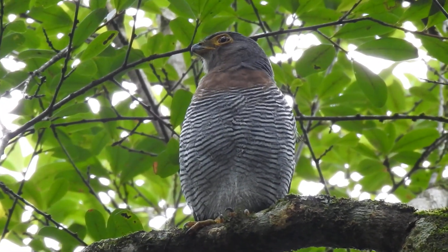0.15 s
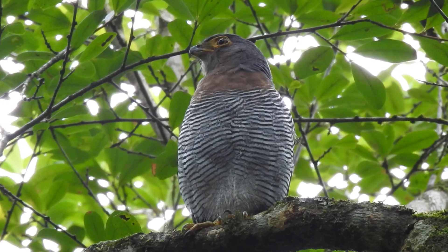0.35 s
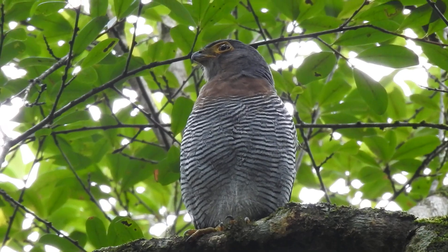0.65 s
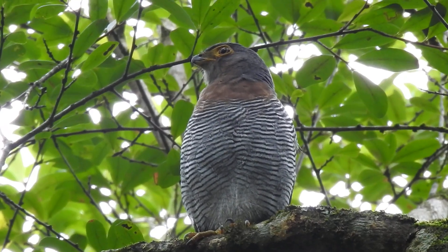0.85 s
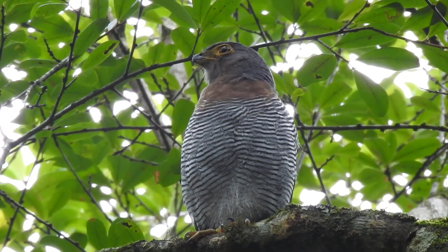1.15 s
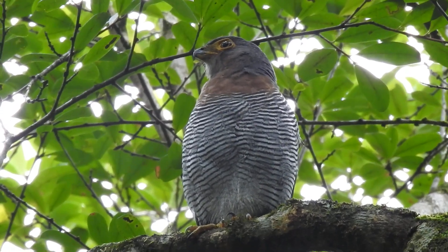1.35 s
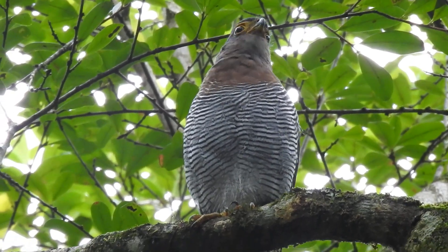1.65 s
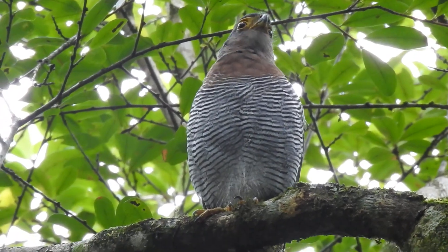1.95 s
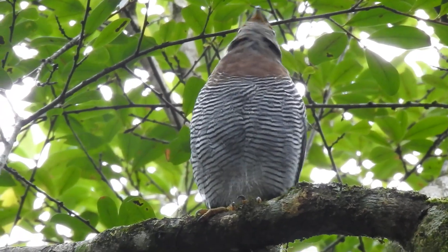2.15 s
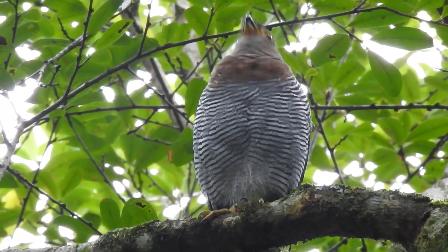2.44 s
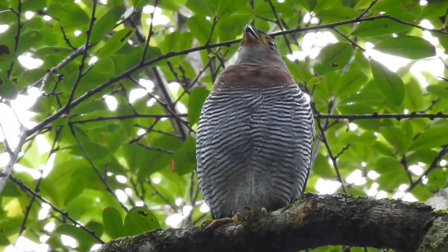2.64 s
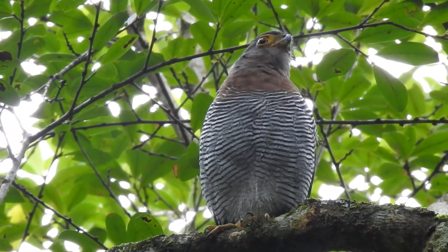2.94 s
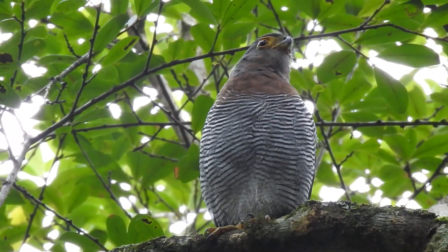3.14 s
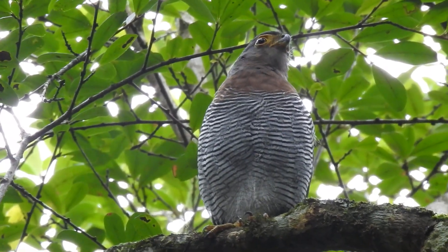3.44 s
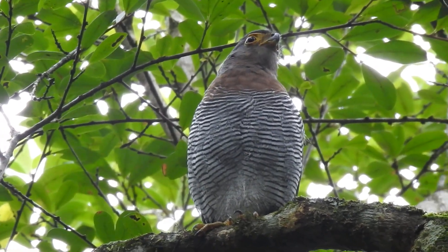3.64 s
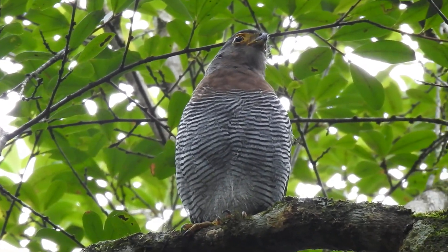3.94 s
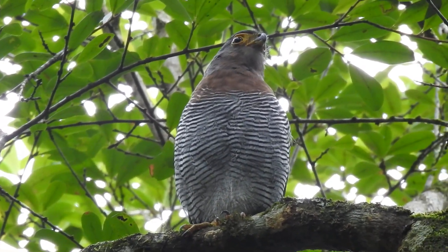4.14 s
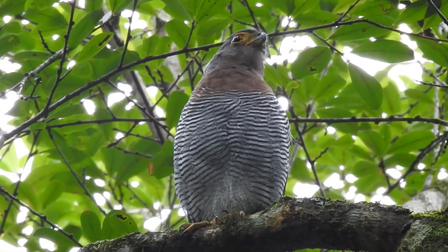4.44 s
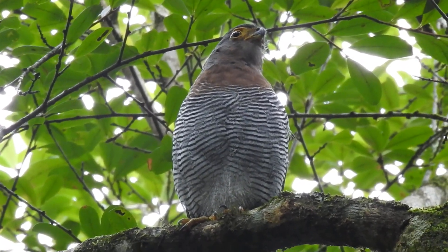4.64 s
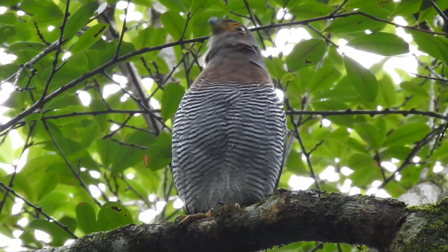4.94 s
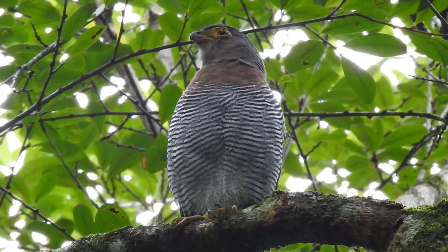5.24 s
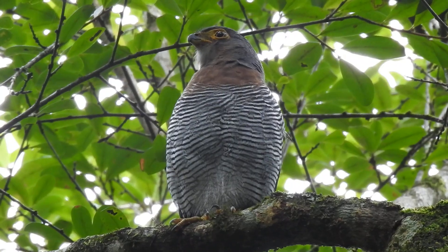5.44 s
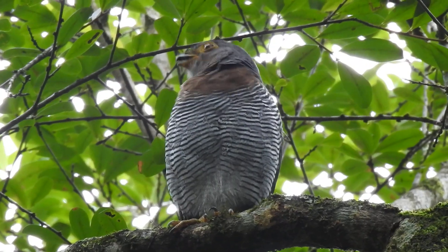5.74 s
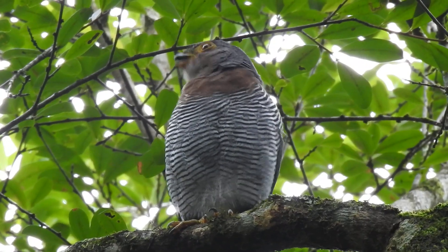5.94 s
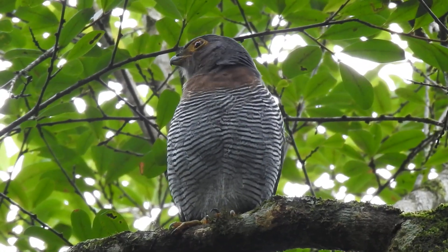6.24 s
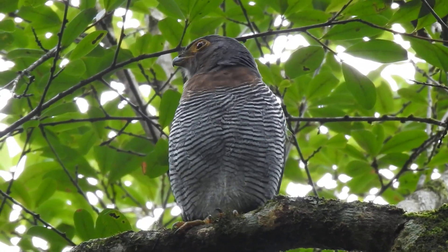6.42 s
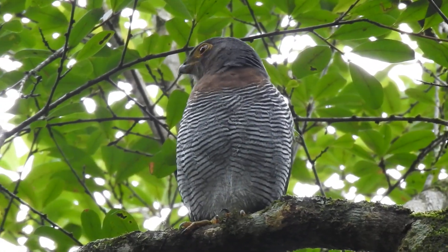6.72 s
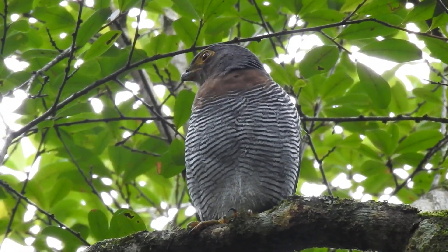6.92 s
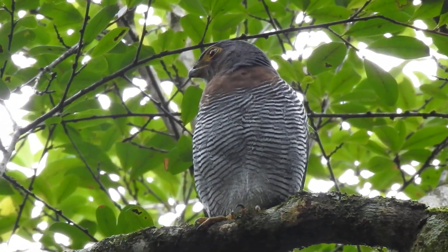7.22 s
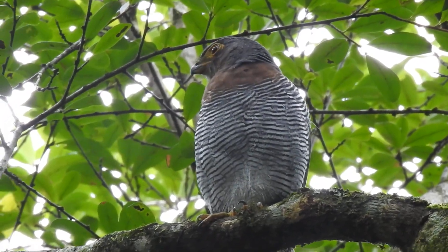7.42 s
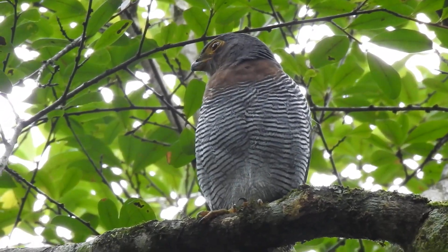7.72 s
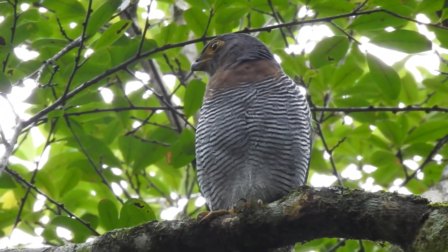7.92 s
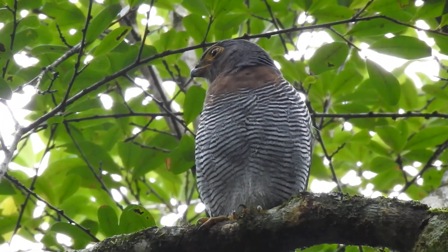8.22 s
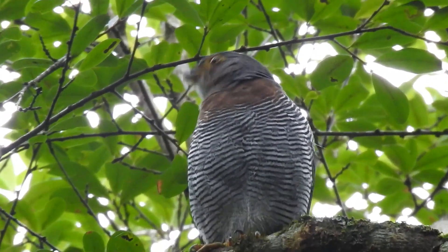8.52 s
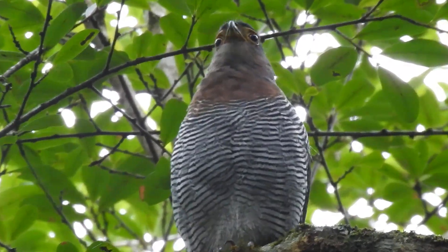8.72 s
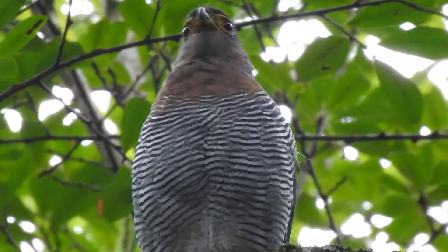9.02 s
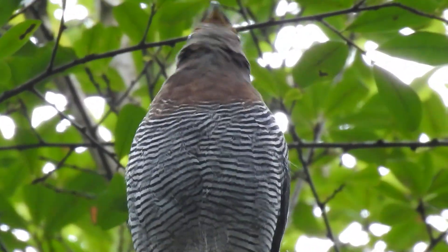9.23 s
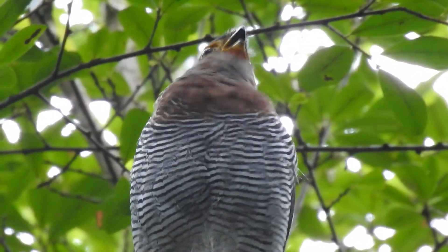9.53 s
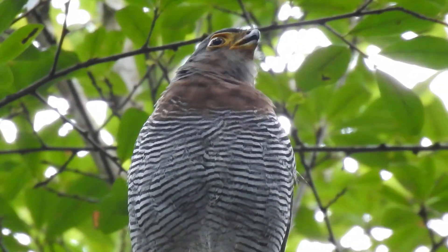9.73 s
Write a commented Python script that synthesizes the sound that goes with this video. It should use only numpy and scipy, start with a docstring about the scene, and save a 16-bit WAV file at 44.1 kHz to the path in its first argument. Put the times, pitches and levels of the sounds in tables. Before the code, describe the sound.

In leafy forest, steady insect hiss and a low soft rumble lie under small birds' chits, slurs and buzzes. A nearby falcon gives three bursts of barking yelps, each opening with a softer note, a pause, then loud abrupt ones. Thin falling whistles drift between. Late on, the camera at the microphones whirs, is bumped and clicks sharply.

```python
"""A small bird chits close by in the leaves, over steady insect hiss and a low forest rumble.
Then a forest falcon on a near branch yelps in three bursts, each a soft note and then four loud ones
(three in the last): stacks of harmonics that glide down and dive. Small birds around it trill swept
whistles as chits, slurs, buzzes and ticks, farther ones whistle thinly; leaves and trunks scatter it all.
Near the end the camera at the two microphones is bumped, its zoom whirs as ringing noise, and it clicks."""
import sys
import numpy as np
from scipy import signal
from scipy.fft import rfft, irfft
from scipy.io import wavfile

SR = 44100
rng = np.random.default_rng(int(sys.argv[2]) if len(sys.argv) > 2 else 0)


def generate_wav(signal):
    """Clip the signal to [-1, 1] and save it as 16-bit WAV at the path in sys.argv[1]."""
    frames = np.transpose(np.atleast_2d(signal))
    scaled = np.clip(frames, -1, 1) * 32767
    pcm = np.round(scaled).astype(np.int16)
    wavfile.write(sys.argv[1], SR, pcm)


N = 435266  # samples

# The falcon's yelps. Each row: start in seconds, level in dB, first pitch in Hz before any squeak,
# glide length in seconds, bend (1 = straight fall, more = pitch held longer),
# first beak resonance in Hz, its level in dB, upper overtones in dB.
FALCON_YELPS = [(1.640, -21, 929, 0.029, 1.28, 7180, -1, -1.5),
                (2.279, -18, 1075, 0.049, 0.99, 6720, 2.5, -3),
                (2.467, -16, 1312, 0.044, 0.88, 6230, -4, 0.5),
                (2.615, -15.5, 1324, 0.035, 0.8, 6170, -6.5, 1.5),
                (2.815, -15.5, 1208, 0.045, 1.28, 6160, -4, 1),
                (5.004, -21, 933, 0.034, 1.17, 7070, -0.5, -3),
                (5.719, -18, 1030, 0.044, 1.08, 6920, -4, -2.5),
                (5.932, -16, 1327, 0.038, 0.97, 6200, -6, 1.5),
                (6.077, -15.5, 1332, 0.033, 1.14, 6100, -5.5, 1),
                (6.273, -18, 1200, .047, 1.7, 5850, -4, 5), (8.675, -21, 966, 0.034, 1, 7250, -14, 2),
                (9.334, -18, 1098, 0.051, 0.84, 6680, 3, -3),
                (9.530, -16, 1324, 0.045, 0.76, 6240, -7.5, 2.5),
                (9.678, -15.5, 1372, 0.04, 0.75, 6340, -5.5, 0.5)]
# Branch and trunk beside the falcon. Each row: delay in seconds, level in dB, polarity.
PERCH_ECHOES = [(.0011, -34.5, 1), (.00268, -16, -1), (.00658, -24, -1), (.00997, -14.5, -1)]
# The falcon's side of the microphones. Each row: frequency in Hz, left minus right in dB.
FALCON_SIDE = [(1000, -1), (2200, 0), (7000, 1.5)]


def falcon():
    """The near bird: direct sound, echoes off its own perch, then the uneven echo of the forest."""
    dry = np.zeros(N)
    for s, *note in FALCON_YELPS:
        add(dry, s, yelp(*note))
    near = dry.copy()
    for delay, db, polarity in PERCH_ECHOES:
        add(near, delay, np.sign(polarity) * amp(db) * dry)
    left = colour(near, [(hz, db / 2) for hz, db in FALCON_SIDE])
    right = colour(near, [(hz, -db / 2) for hz, db in FALCON_SIDE])
    flutter = amp(2 * wander(N, 70))
    echo = scatter(near, near_db=-3.0, near_t60=0.15, far_db=-11.0, gap_s=0.0041,
                   width=0.74, echoes_per_s=800)
    return np.array([left, right]) + flutter * echo


SOFT_HZ, FORCED_HZ = 926, 1215  # first pitch of the softest and of a fully forced yelp
BREAK_HZ, LAST_HZ = 811.6, 475  # the glide ends where the voice gives way, the dive at the last pitch
SOFT_DIVE_S, FORCED_DIVE_S = .032, .02
GLIDE_FADE_DB, DIVE_FADE_DB = -8.5, -9
SOFT_BEAK_SHIFT_HZ, FORCED_BEAK_SHIFT_HZ = -550, 890  # how far the beak resonance moves in a glide
# The falcon's colour as heard: throat and beak, with narrow dips from nearby reflections.
# Each row: frequency in Hz, gain in dB.
FALCON_COLOUR = [(450, -20), (820, -10.5), (895, -15.5), (970, -14.5), (1250, -18), (1520, -24),
                 (1720, -19.5), (2700, -16), (3550, -12.5), (4150, -23.5), (4700, -19), (5200, -17),
                 (6500, -26.5), (7400, -17), (8400, -19), (10000, -26.5), (12500, -43.5), (16000, -59.5)]


def yelp(level_db, first_hz, length, bend, beak_hz, beak_db, bright_db, jitter=0.012, beak_width_hz=330,
         squeak=0.12, squeak_s=0.0012, rasp_db=-42, uneven_db=5, tuned_db=19.5, dull_db=-8, mellow_db=3,
         spent_db=-5.0):
    """Harmonics glide, then dive; the throat favours the second, less so in the dive; the beak rings."""
    # high notes are forced: they start abruptly, with a squeak
    force = np.clip((first_hz - SOFT_HZ) / (FORCED_HZ - SOFT_HZ), 0, 1)
    dive_s = SOFT_DIVE_S + force * (FORCED_DIVE_S - SOFT_DIVE_S)
    t = np.arange(0, length + dive_s, 1 / SR)
    glide, dive = ramp(t, length), ramp(t - length, dive_s)

    pitch = first_hz + (BREAK_HZ - first_hz) * glide ** bend + (LAST_HZ - BREAK_HZ) * dive
    pitch = pitch * (1 + force * squeak * np.exp(-t / squeak_s))
    order = np.arange(1, 19)[:, None]
    # rougher as the voice gives way
    hz = order * pitch * (1 + jitter * (1 + 2 * dive) * wander(len(t), 1571))

    tuned = tuned_db * (order == 2) * (1 - np.sqrt(dive) / 2)
    gain = amp(read(FALCON_COLOUR, hz) + tuned + bright_db * (order > 3))
    gain = gain * amp(mellow_db * (1.5 - force) * (order == 1))  # soft yelps: fuller fundamental
    shift_hz = SOFT_BEAK_SHIFT_HZ + force * (FORCED_BEAK_SHIFT_HZ - SOFT_BEAK_SHIFT_HZ)
    beak = beak_hz + glide * shift_hz
    gain = gain + amp(beak_db) / (1 + ((hz - beak) / beak_width_hz) ** 2)
    flutter = np.array([wander(len(t), 150) for _ in order])
    gain = gain * amp(uneven_db * np.minimum(order / 4, 1) * flutter)  # the overtones flutter most
    gain = gain * amp(dull_db * (glide ** 2 + dive) * (order > 3))  # and die first

    turns = np.cumsum(hz, 1) / SR + rng.random(order.shape)
    voice = (gain * (hz < SR / 2) * np.sin(2 * np.pi * turns)).sum(0)
    voice += force * amp(rasp_db) * unit(colour(rng.standard_normal(len(t)), FALCON_COLOUR))
    attack = 1 - np.exp(-t / (0.0013 + 0.0072 * (1 - force)))
    gate = attack * signal.windows.tukey(len(t), .03)
    fade_db = GLIDE_FADE_DB * glide ** 2 + DIVE_FADE_DB * dive
    fade_db = fade_db + spent_db * force * glide  # forced notes are spent sooner
    return np.sqrt(2) * voice * amp(level_db + fade_db) * gate


LEAD_S = .2  # the track of the birds in the foliage begins this long before time zero
# How the birds near the falcon shape each kind of call: settings of chirp() by name, with
# frequencies in Hz, times in seconds, levels in dB, and drop, scoop, trill depth and jitter as fractions.
CHIT_SHAPE = dict(top_hz=3112, length=.05, start_hz=1760, rise_s=.028, rise_curve=1.7, drop=0.167, drop_s=0.016, attack_s=0.019, onset_db=-16, fade_db_per_s=-300, trill_hz=167.2, trill_depth=0.12, trill_grows_s=0.03, jitter=0.022, partials_db=[4, 3.5, 6.5, 10, -15])
SLUR_SHAPE = dict(start_hz=4180, rise_s=0.046, attack_s=0.032, onset_db=-18.5, fade_db_per_s=-13, release_s=0.039, trill_hz=144.1, trill_depth=0.028, jitter=0.013, partials_db=[-1, -20])
BUZZ_SHAPE = dict(start_hz=3960, rise_s=.018, drop=0.44, drop_s=0.016, attack_s=0.013, onset_db=-15, fade_db_per_s=-93, release_s=0.0052, trill_hz=160.3, trill_depth=0.18, trill_grows_s=0.0335, jitter=0.0324, partials_db=[0])
PIP_SHAPE = dict(top_hz=1766, length=0.036, start_hz=1152, rise_s=0.015, drop=0.17, drop_s=0.0112, attack_s=0.016, onset_db=-14.5, fade_db_per_s=-300, release_s=0.014, trill_hz=163, trill_depth=0.077, jitter=0.044, partials_db=[-12.5, 6, -2.5, -6])
TICK_SHAPE = dict(top_hz=3660, length=0.048, start_hz=2380, rise_s=0.045, rise_curve=4.6, scoop=0.208, attack_s=0.0425, onset_db=-19, fade_db_per_s=-1200, trill_hz=119, trill_depth=.006, jitter=0.02, partials_db=[-16, -2, 5.5])
# Chits, pips and ticks, before colour and foliage. Each row: start in seconds, level in dB.
CHIT_CALLS = [(.046, -28.5), (.445, -41), (1.329, -29.5), (2.146, -28.5), (2.92, -27), (3.716, -28),
              (4.76, -28.5), (5.74, -27), (6.743, -27), (7.942, -28), (9.003, -25.5)]
PIP_CALLS = [(.591, -22.5), (5.226, -23)]
TICK_CALLS = [(9.156, -22.5), (9.265, -25)]
# Slurs and buzzes, before colour and foliage.
# Each row: start in seconds, level in dB, top pitch in Hz, length in seconds.
SLUR_CALLS = [(-.085, -12.5, 6120, 0.093), (3.803, -14.5, 6283, 0.092), (8.141, -13, 6244, 0.11)]
BUZZ_CALLS = [(.509, -12.5, 6990, 0.079), (4.368, -13.5, 6880, 0.098), (8.834, -13.5, 7160, 0.08)]


def small_birds():
    """Scolding birds in the foliage, one already in mid-call, and a nearer one that ticks."""
    chits = colour(chirps(CHIT_CALLS, CHIT_SHAPE, LEAD_S),
                   [(2100, 3.5), (2750, -7.0), (3600, 8.5), (4300, 11.0), (5300, 17.0), (7000, 14.5),
                    (8500, -4.5), (11000, -15.0)])
    slurs = chirps(SLUR_CALLS, SLUR_SHAPE, LEAD_S)
    pips = chirps(PIP_CALLS, PIP_SHAPE, LEAD_S)
    buzzes = colour(chirps(BUZZ_CALLS, BUZZ_SHAPE, LEAD_S),
                    [(4300, -7), (5600, -4.5), (6900, 1), (8000, -4), (8500, -18)])
    scolds = in_foliage(chits + slurs + pips, left_db=2.0) + in_foliage(buzzes, left_db=0.0)
    ticks = colour(chirps(TICK_CALLS, TICK_SHAPE), [(7000, 3.5), (9000, -32)])
    tick_echo = scatter(colour(ticks, LEAF_COLOUR), near_db=3, near_t60=0.091, far_db=0.5, gap_s=0.0045)
    return scolds + ticks + tick_echo


def chirps(calls, kind, lead_s=0):
    """All calls of one kind, on a track that begins lead_s before time zero."""
    out = np.zeros(N + round(lead_s * SR))
    for s, *call in calls:
        add(out, s + lead_s, chirp(*call, **kind))
    return out


def chirp(level_db, top_hz, length, trill_hz, trill_depth, jitter, partials_db, start_hz=None, rise_s=.02,
          rise_curve=1, sag_hz_per_s=0, drop=0, drop_s=.02, attack_s=.002, onset_db=0, fade_db_per_s=0,
          release_s=0.002, trill_grows_s=0.022, scoop=0):
    """A whistle whose pitch may rise, sag and drop, shaken by a fast uneven trill; it swells and fades."""
    t = np.arange(0, length, 1 / SR)
    hz = top_hz - sag_hz_per_s * t
    if start_hz:
        hz = hz - (top_hz - start_hz) * (1 - ramp(t, rise_s) ** rise_curve)
    hz = hz * (1 - drop * (1 - ramp(length - t, drop_s)))
    hz = hz * (1 - scoop * np.exp(-t / 0.00497))  # some calls scoop up into their first pitch
    trill_turns = np.cumsum(trill_hz * (1 + 0.171 * wander(len(t), 101.1))) / SR
    trill = ramp(t, trill_grows_s) ** 2 * np.sin(2 * np.pi * trill_turns)
    turns = np.cumsum(hz * (1 + trill_depth * trill) * (1 + jitter * wander(len(t), 874.0))) / SR
    tone = sum(amp(db) * np.sin(2 * np.pi * k * turns) for k, db in enumerate(partials_db, 1))
    shape_db = onset_db * (1 - ramp(t, attack_s)) + fade_db_per_s * np.maximum(t - attack_s, 0)
    gate = ramp(length - t, release_s) * signal.windows.tukey(len(t), .08)
    return unit(tone) * amp(level_db + shape_db) * gate


# Leaves throw back short waves best. Each row: frequency in Hz, gain in dB.
LEAF_COLOUR = [(2000, -8.5), (4200, -1)]


def in_foliage(dry, left_db):
    """A bird deep in the leaves, which absorb its top: quiet direct sound and a longer echo."""
    dry = colour(dry, [(9500, 1.0), (12500, -33)])
    echo = scatter(colour(dry, LEAF_COLOUR), near_db=-2.0, near_t60=0.48, far_db=-17.0, gap_s=0.0021)
    both = placed(amp(-13) * dry, 4 * left_db) + placed(echo, left_db)
    return both[:, -N:]  # drops the lead before time zero


# The thin whistle's shape: settings of chirp() by name, in the same units as the calls above.
WHISTLE_SHAPE = dict(sag_hz_per_s=1700, drop=0.051, drop_s=0.061, attack_s=0.051, onset_db=-1.5, fade_db_per_s=-15, release_s=0.037, trill_hz=184, trill_depth=0.015, jitter=0.012, partials_db=[0])
# Whistles, before hiss and echo.
# Each row: start in seconds, level in dB, top pitch in Hz, length in seconds.
WHISTLE_CALLS = [(.94, -41.5, 7210, 0.23), (1.81, -40.5, 6910, 0.22), (3.64, -38, 7240, 0.09),
                 (4.338, -37.5, 6840, 0.21), (4.965, -36, 6690, 0.12), (6.512, -39.5, 6810, 0.23),
                 (7.53, -41, 6790, 0.24), (8.35, -41, 6680, 0.79)]
# Faint pure notes from far birds, and one long insect tone near 6 kHz, before echo.
# Each row: start in seconds, length in seconds, pitch in Hz, fall in Hz, level in dB.
FAINT_TONES = [(1.415, 0.018, 2013, 80, -54), (3.327, 0.36, 6130, 153, -61),
               (4.344, 0.07, 2500, 520, -57.5), (5.412, 0.048, 4990, 14, -52)]


def far_birds_and_insect_tone():
    """Thin, hissy falling whistles, faint pure bird notes and one insect tone, heard only as echo."""
    whistles = chirps(WHISTLE_CALLS, WHISTLE_SHAPE)
    hiss = unit(colour(rng.standard_normal(N),
                       [(4000, -22.5), (5500, -7.5), (6800, 2.5), (7800, -11.5), (9500, -47)]))
    envelope = abs(signal.hilbert(whistles))
    dry = amp(-3.0) * whistles + amp(-6.5) * hiss * envelope
    for s, length, hz, fall_hz, level_db in FAINT_TONES:
        size = round(length * SR)
        pitch = (hz - np.linspace(0, fall_hz, size)) * (1 + 0.0044 * wander(size, 47))
        tone = np.sin(2 * np.pi * np.cumsum(pitch) / SR)
        add(dry, s, amp(level_db) * unit(tone) * signal.windows.tukey(size, .5))
    return placed(scatter(dry, near_db=1.5, near_t60=0.056, far_db=0, gap_s=0.002), left_db=3.0)


def camera():
    """The camera at the microphones: zoom motor, bumps and click, the same on both sides."""
    return zoom_motor() + knocks() + lever_click()


GEAR_TICKS_PER_S = 4000  # on average
# What the motor rings. Each row: frequency in Hz, width in Hz, relative level in dB.
HOUSING_RINGS = [(537, 59, -7), (804, 49, -0.5), (1070, 37, -6), (1246, 97, -1.5)]


def zoom_motor():
    """Gears scrape as random ticks and ring the resonances of the housing; the loudness is lumpy."""
    hz = np.fft.rfftfreq(N, 1 / SR)
    body = sum(amp(db) / (1 + ((hz - f) / width) ** 2) for f, width, db in HOUSING_RINGS)
    gears = rng.standard_normal(N) * (rng.random(N) < GEAR_TICKS_PER_S / SR)
    whir = unit(irfft(rfft(gears) * body, N))
    lumps = amp(3.5 * wander(N, 70))
    return whir * zoom_level(np.arange(N) / SR) * lumps


SPIN_UP_DB_PER_S, RUN_DOWN_DB_PER_S = 418, 297
# The zoom motor's two runs. Each row: start in seconds, length in seconds,
# level at the start in dB before the lumps, swell in dB per second.
ZOOM_RUNS = [(8.43, 0.41, -53, 11), (8.86, 0.27, -46.5, 49)]


def zoom_level(t):
    """The motor's loudness: each run spins up, swells and runs down."""
    total = 0
    for s, length, level_db, swell in ZOOM_RUNS:
        run_db = level_db + swell * np.clip(t - s, 0, length)
        spin_up_db = SPIN_UP_DB_PER_S * np.maximum(s - t, 0)
        run_down_db = RUN_DOWN_DB_PER_S * np.maximum(t - s - length, 0)
        total = total + amp(run_db - spin_up_db - run_down_db)
    return total


# Knocks on the camera: two bumps of fingers on the body, then the ring of the lever's click. # Each row: start
# in seconds, pitch in Hz, level in dB, time to fall by 60 dB in seconds.
KNOCKS = [(8.057, 1226, -33.5, 0.052), (8.447, 150, -30, 0.066), (9.1146, 1080, -13.5, 0.031)]


def knocks():
    """Fingers bump the body and the lever's click rings: each knock is one decaying sine."""
    out, t = np.zeros(N), np.arange(SR // 10) / SR
    for s, pitch, level_db, t60 in KNOCKS:
        add(out, s, amp(level_db - 60 * t / t60) * np.sin(2 * np.pi * pitch * t))
    return out


CLICK_S, CLICK_DB = 9.1132, -12
# The colour of the lever's click. Each row: frequency in Hz, relative gain in dB.
LEVER_COLOUR = [(600, -51), (1900, 1.5), (3200, -15), (7200, 5), (9000, -20), (15000, -30)]


def lever_click():
    """The lever clicks: coloured noise that quickly swells and dies."""
    out, t = np.zeros(N), np.arange(SR // 10) / SR
    snap = unit(colour(rng.standard_normal(len(t)), LEVER_COLOUR))
    rise = t / .0012  # peaks after 1.2 ms
    add(out, CLICK_S, amp(CLICK_DB) * snap * (rise * np.exp(1 - rise)) ** 2)
    return out


def background():
    """Low forest rumble and a steady band of insect hiss, both swelling slightly together."""
    swell = amp(.7 * wander(N, 5))
    return swell * (rumble() + insects())


# The forest floor's rumble. Each row: frequency in Hz, relative level in dB per Hz.
RUMBLE_COLOUR = [(15, -70), (41, -8), (72, 7), (108, -5.5), (180, 0.5), (330, -7.5), (540, -12),
                 (1430, -17.5), (3000, -27.5), (7000, -35)]


def rumble():
    """Low-heavy noise of uneven level, equally loud at both microphones."""
    noise = unit(colour(pair(rng.standard_normal((2, N))), RUMBLE_COLOUR))
    return noise * amp(-49 + 1.48 * wander(N, 12))


# The insects' band of hiss. Each row: frequency in Hz, relative level in dB per Hz.
INSECT_COLOUR = [(2500, -12), (3600, -9), (4800, -10), (5500, -3.5), (6000, 2.5), (6700, -8), (8000, -14),
                 (11000, -22), (16000, -38)]


def insects():
    """Many insects blur into noise strongest near 6 kHz, a little to the left."""
    hiss = unit(colour(pair(rng.standard_normal((2, N))), INSECT_COLOUR)) * amp(-50.5)
    return placed(hiss, left_db=1.5)


# How long the forest's tail rings. Each row: frequency in Hz, time to fall by 60 dB in seconds.
FOREST_DECAY = [(500, 0.82), (2200, 0.69), (6000, 0.84), (8000, 0.89), (13000, 0.05)]


def scatter(x, near_db, near_t60, far_db, gap_s, width=1, echoes_per_s=1600):
    """A quick spray of echoes from near leaves and trunks, and the long tail of the forest."""
    t = np.arange(SR) / SR
    hits = rng.random(SR) < echoes_per_s / SR
    leaves = rng.choice([-1, 1], (2, SR)) * hits * amp(-60 * t / near_t60) * (t > gap_s)
    leaves = leaves * np.array([[1], [width]])  # echoes from straight ahead differ less between the ears
    hz, when, z = signal.stft(rng.standard_normal((2, SR)), SR, nperseg=256)
    decay = amp(-60 * when / read(FOREST_DECAY, hz)[:, None])
    depth = signal.istft(z * decay, SR, nperseg=256)[1][:, :SR]
    depth = depth * np.clip((t - gap_s) / 0.03, 0, 1)
    echoes = pair(amp(near_db) * unit(leaves) + amp(far_db) * unit(depth)) / np.sqrt(SR)
    return signal.oaconvolve(x[None], echoes, axes=1)[:, :len(x)]


# Diffuse sound at the two microphones. Each row: frequency in Hz, left-right likeness from 0 to 1.
LIKENESS = [(60, 0.97), (250, 0.81), (1000, 0.66), (2200, 0.52), (4000, 0.42), (7000, 0.029), (14000, 0.09)]


def pair(two):
    """Makes two unrelated signals as alike as diffuse sound is at two close microphones."""
    size = two.shape[-1]
    c = np.clip(read(LIKENESS, np.fft.rfftfreq(size, 1 / SR)), -1, 1)
    mid, side = rfft(two) * np.sqrt([(1 + c) / 2, (1 - c) / 2])
    return irfft(np.array([mid + side, mid - side]), size)


def placed(x, left_db):
    """Sets a sound to one side: left minus right is left_db."""
    return x * amp([[left_db / 2], [-left_db / 2]])


def amp(db):
    """Decibels to gain."""
    return 10 ** (np.asarray(db) / 20)


def unit(x):
    """Scales to rms 1."""
    return x / np.sqrt(np.mean(x ** 2) + 1e-20)


def ramp(t, span):
    """Goes from 0 to 1 in the given time and stays there."""
    return np.clip(t / span, 0, 1)


def read(points, hz):
    """Reads a spectrum on a log-frequency axis."""
    f, value = np.transpose(points)
    return np.interp(np.log(hz + 1), np.log(f + 1), value)


def colour(x, points):
    """Filters by a spectrum in dB."""
    size = x.shape[-1]
    return irfft(rfft(x) * amp(read(points, np.fft.rfftfreq(size, 1 / SR))), size)


def wander(size, per_s):
    """Random drift: straight lines between per_s normal random points a second."""
    t = np.arange(size) / SR
    return np.interp(t * per_s, np.arange(4096), rng.standard_normal(4096))


def add(mix, s, sound):
    """Mixes a sound in at time s, cut to fit."""
    at = round(s * SR)
    sound = sound[max(-at, 0):]
    part = mix[max(at, 0):][:len(sound)]
    part += sound[:len(part)]


def scene():
    """Everything at the two microphones."""
    return falcon() + small_birds() + far_birds_and_insect_tone() + camera() + background()


def record(dry):
    """The recorder's band limit: a steep low-pass at 15.85 kHz."""
    low_pass = signal.firwin(511, 15850, window=("kaiser", 9), fs=SR)
    return signal.oaconvolve(dry, low_pass[None], "same")


dry = scene()
out = record(dry)
generate_wav(out)
```